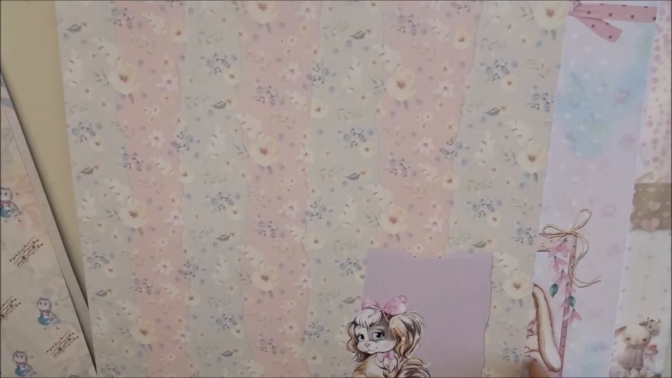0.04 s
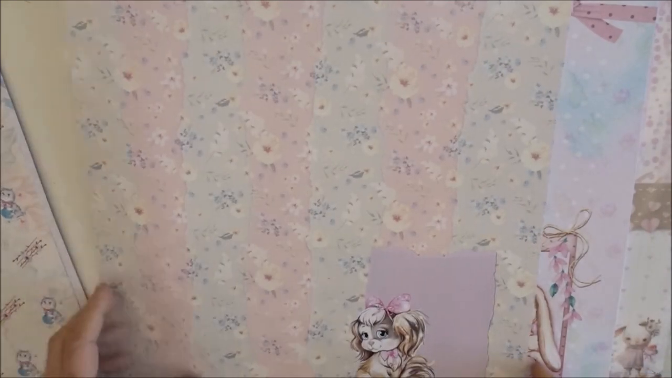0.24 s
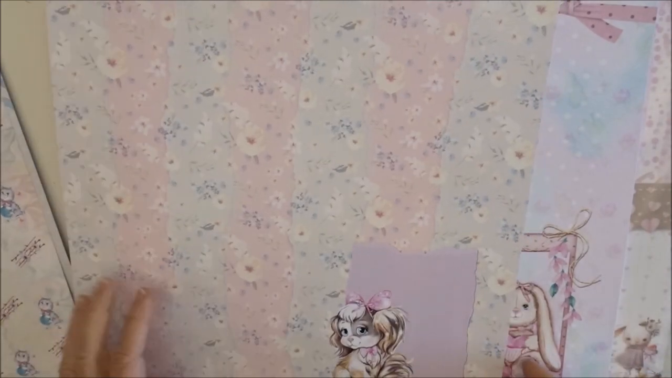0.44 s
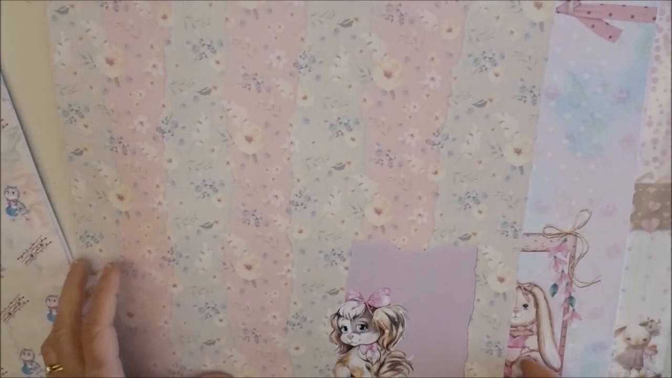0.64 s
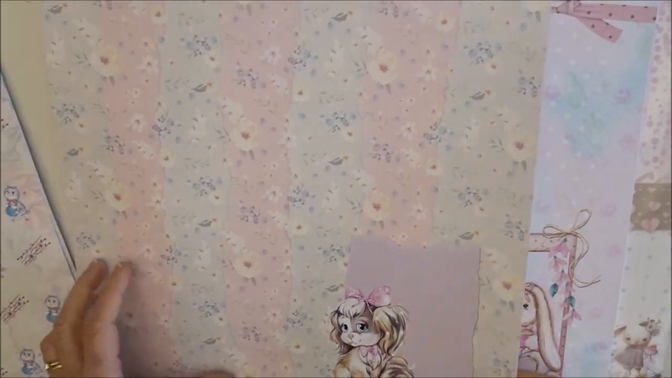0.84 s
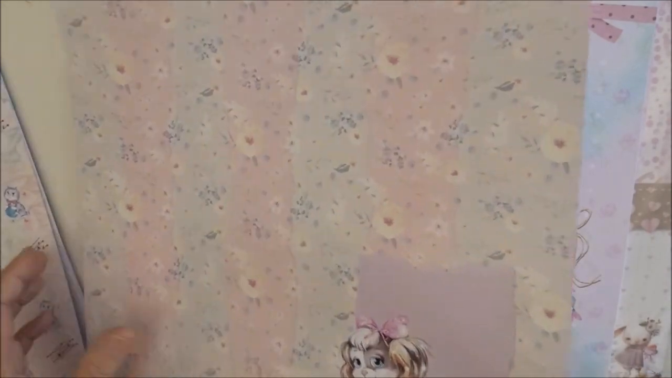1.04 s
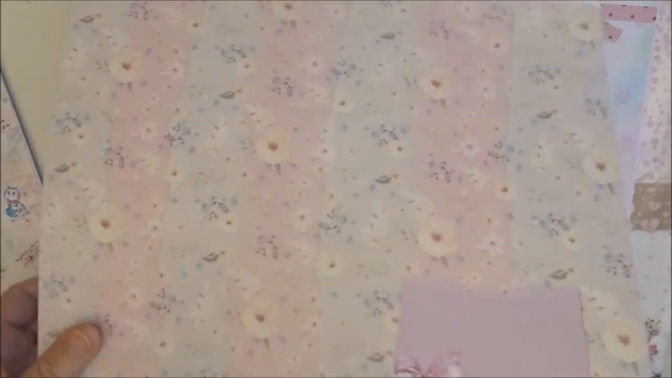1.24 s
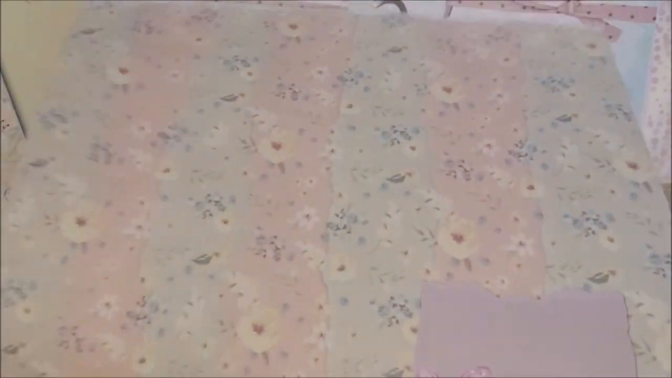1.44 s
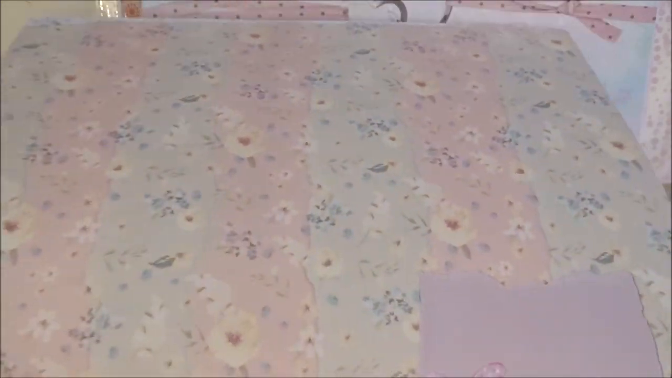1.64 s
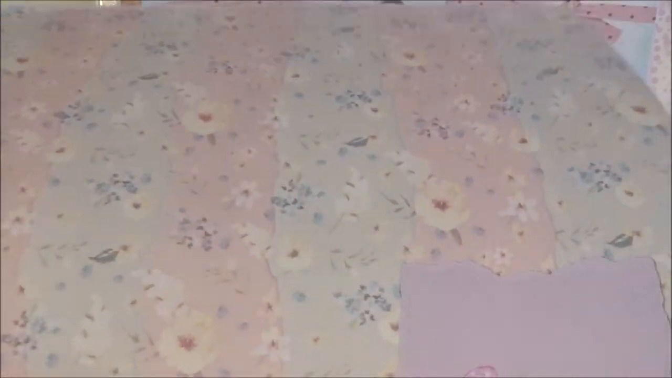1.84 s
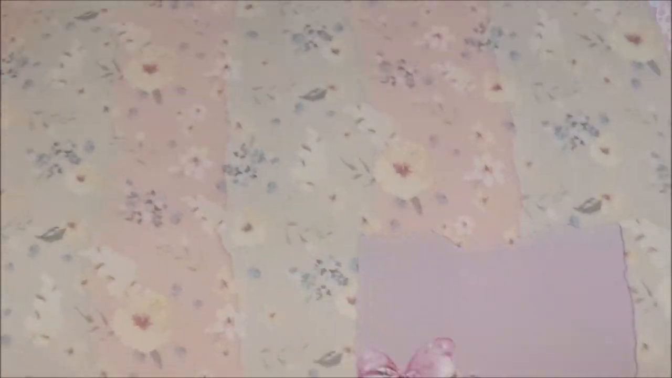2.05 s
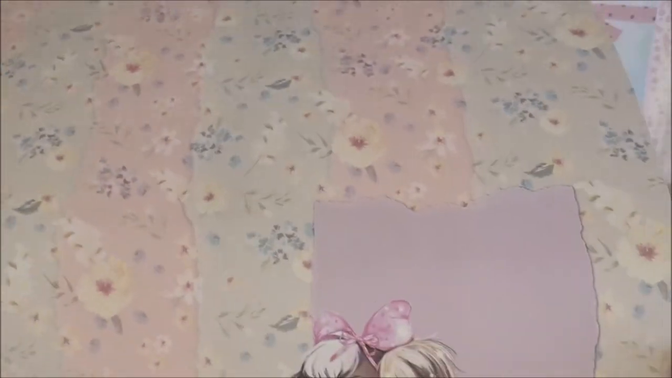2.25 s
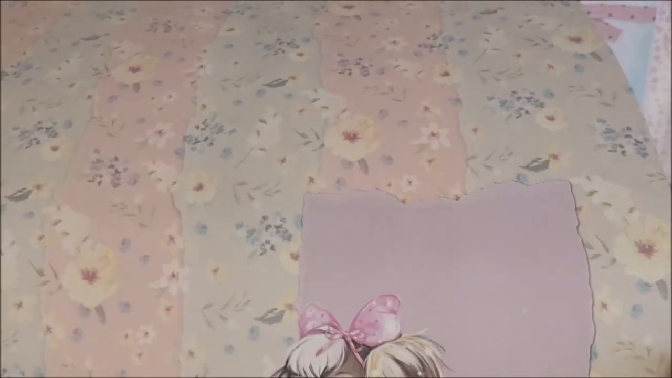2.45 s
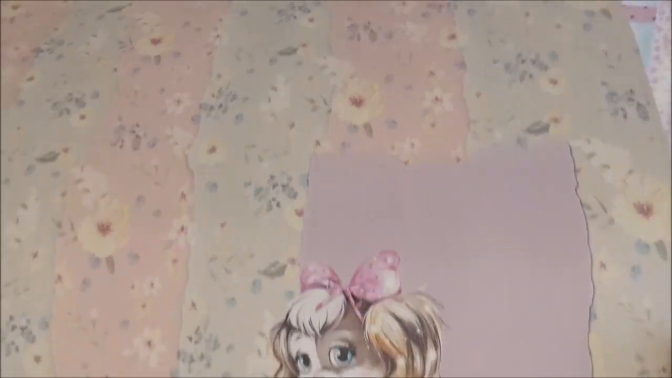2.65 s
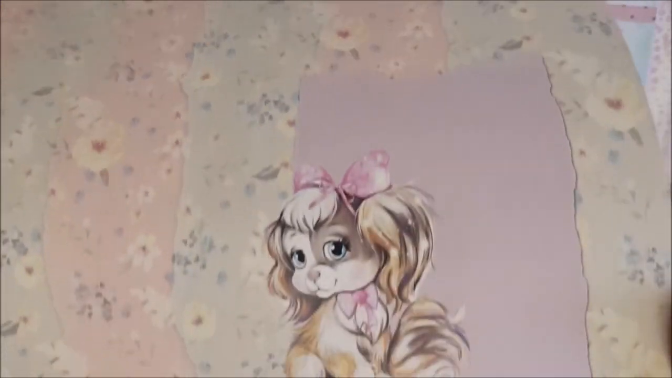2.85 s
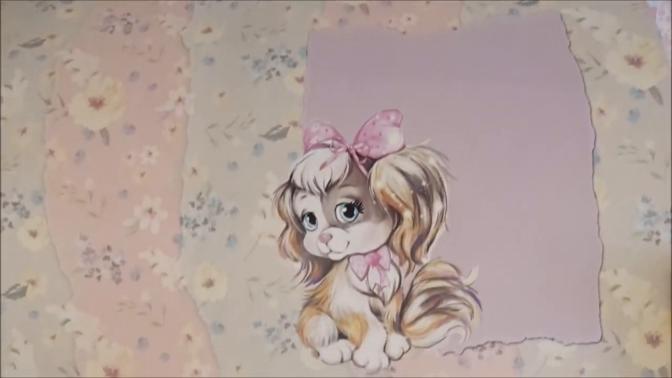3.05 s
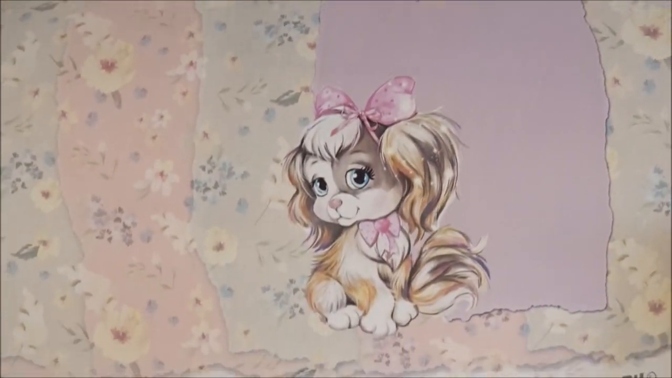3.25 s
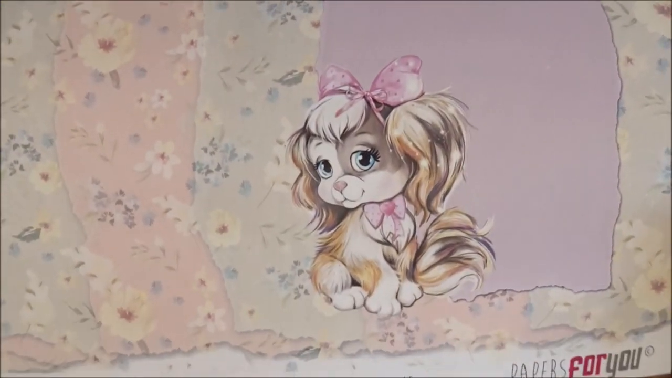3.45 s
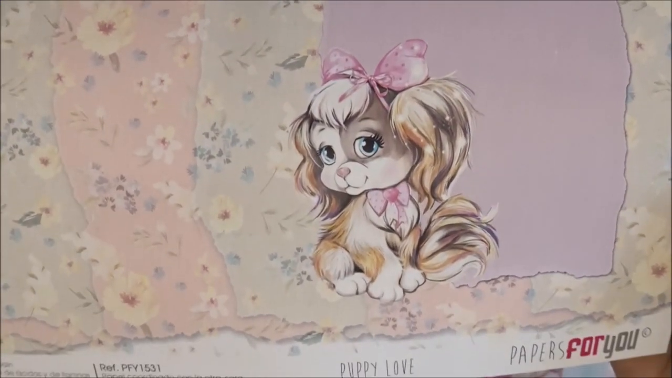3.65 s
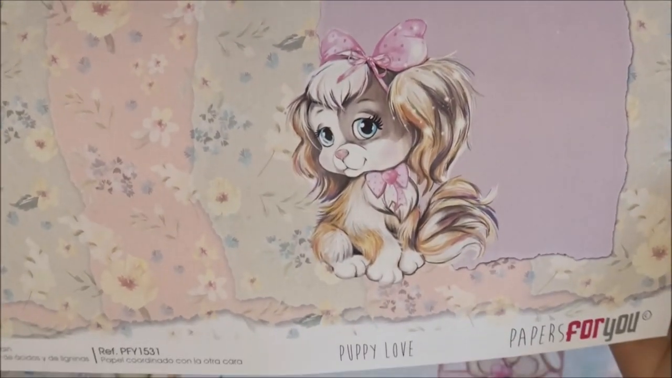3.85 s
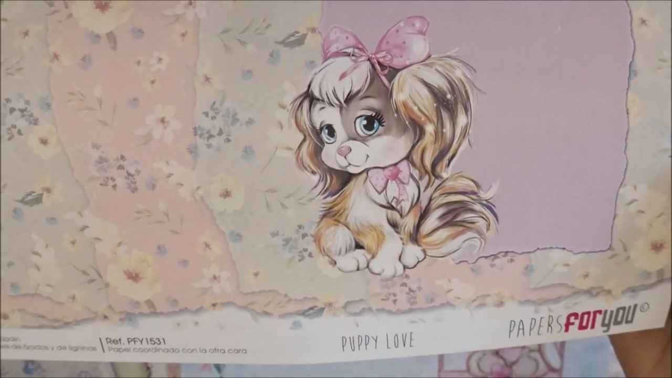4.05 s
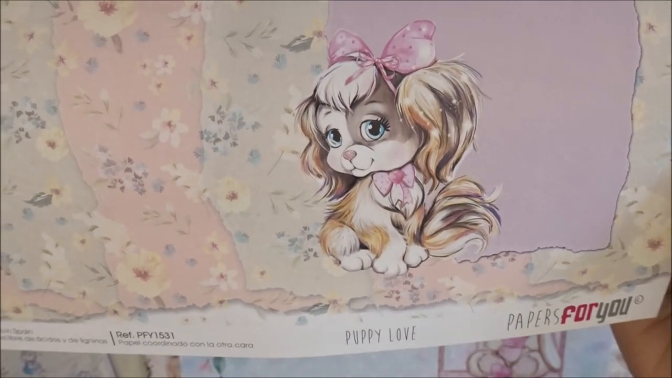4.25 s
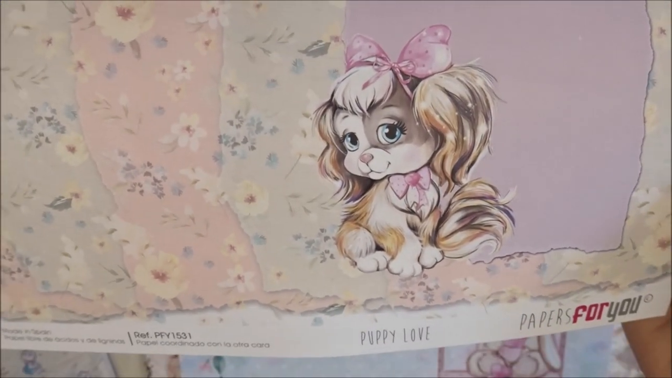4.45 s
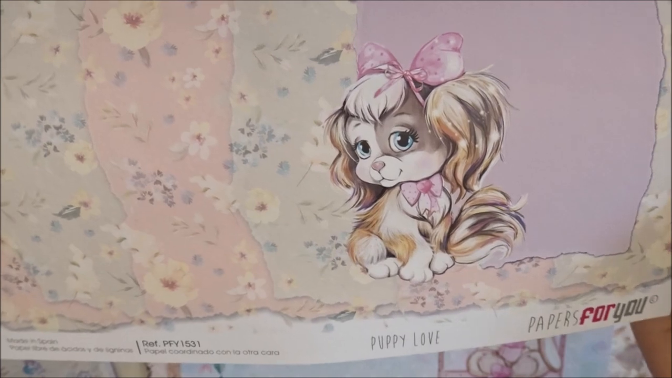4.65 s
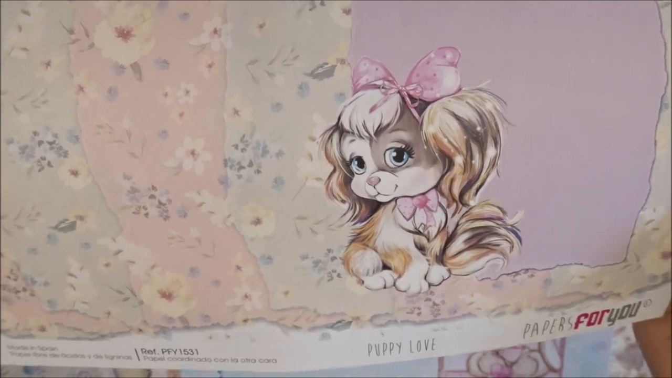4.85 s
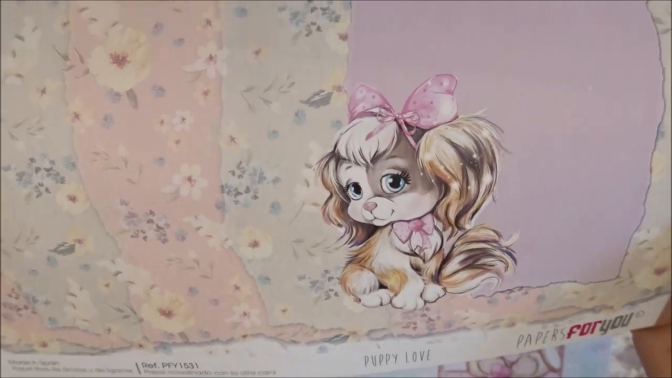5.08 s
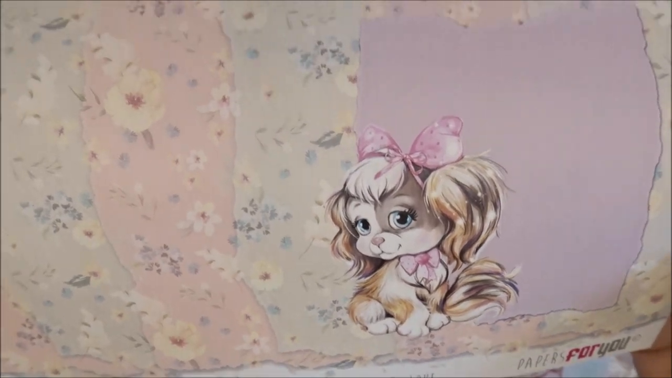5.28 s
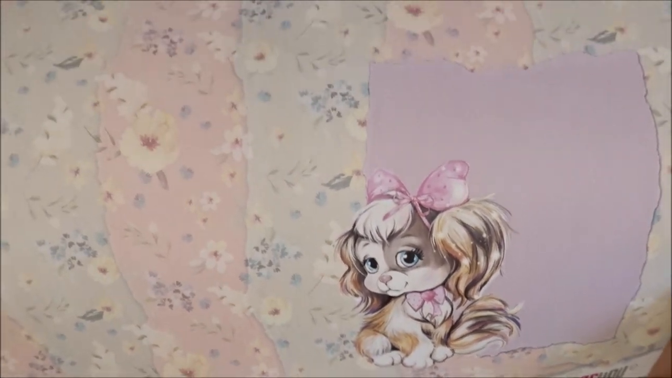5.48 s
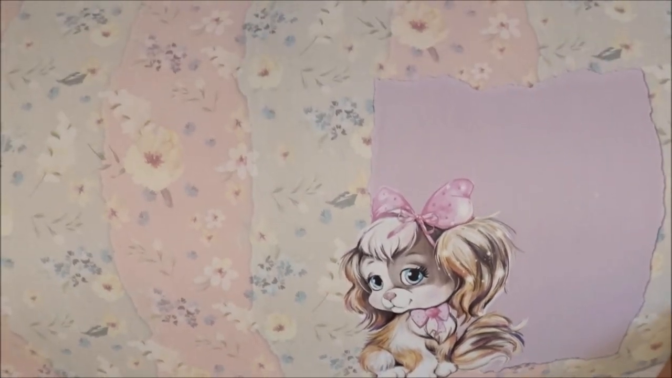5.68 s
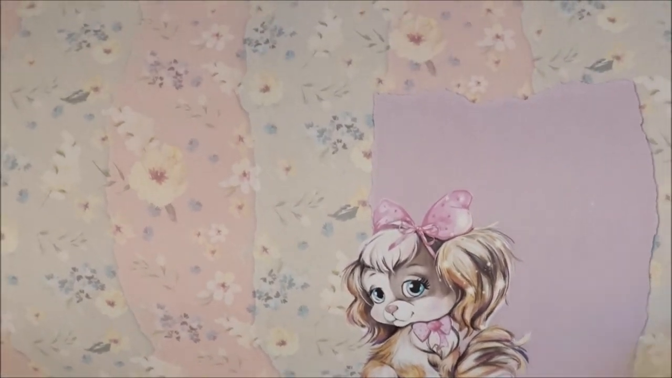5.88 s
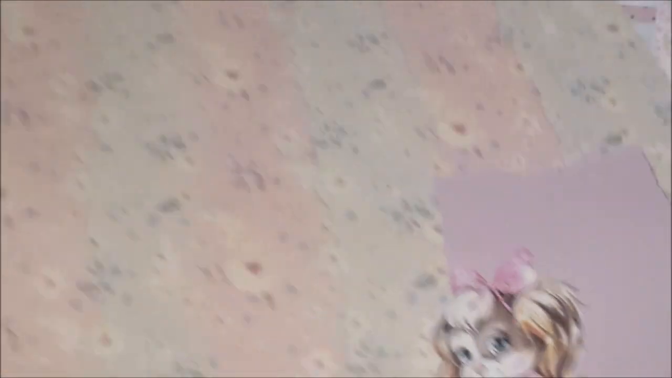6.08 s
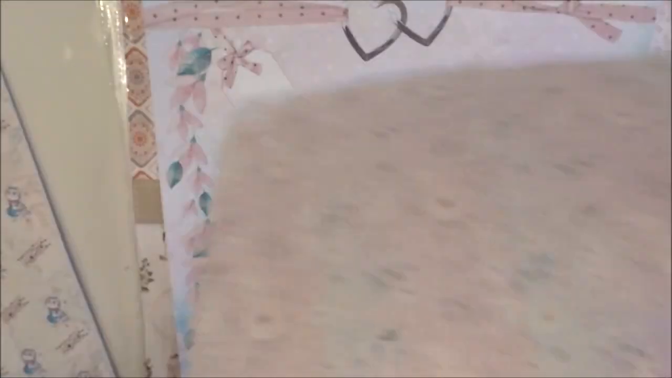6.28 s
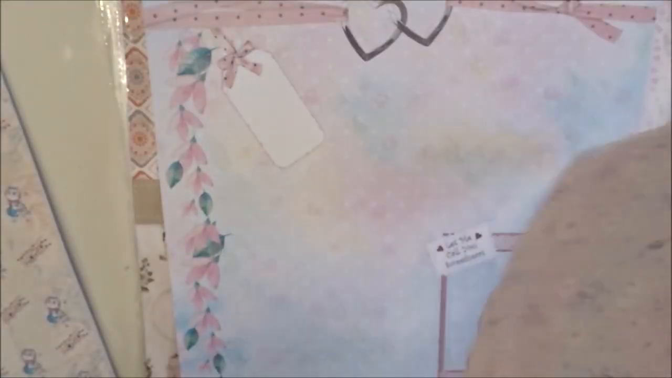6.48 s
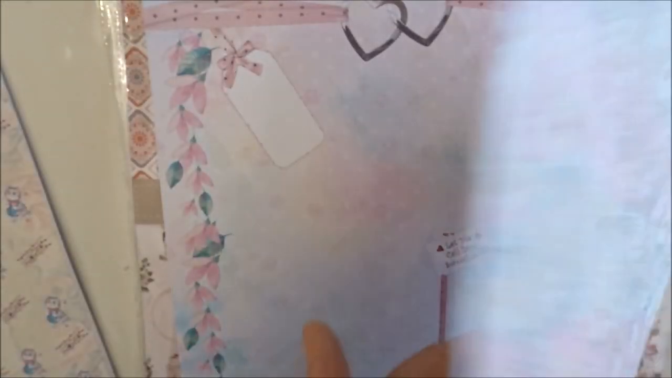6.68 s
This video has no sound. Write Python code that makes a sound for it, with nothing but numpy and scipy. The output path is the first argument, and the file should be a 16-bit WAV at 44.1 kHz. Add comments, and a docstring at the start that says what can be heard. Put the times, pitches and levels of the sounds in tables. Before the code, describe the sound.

Dry rubs and sharp clicks of a handled paper sheet, loud flexing pops early, midway and near the end, with near-quiet between.

```python
"""Dry rustles, low rumbles, pops and ticks are heard as stiff card paper is handled in a quiet room.
Skin and edges rub the sheet: clumped friction noise drives broad resonances, a hiss and a moving tone.
Bending excites low modes, a bulge flipping over sends out a short pulse, a catch is a dying noise burst.
Pops and ticks reverberate as decaying noise; a low wavering sine hums over a hush of filtered noise."""
import sys
import numpy as np
from scipy import signal
from scipy.fft import rfft, irfft, next_fast_len
from scipy.io import wavfile
from scipy.ndimage import uniform_filter1d, map_coordinates

SR = 44100
rng = np.random.default_rng(int(sys.argv[2]) if len(sys.argv) > 2 else 0)


def to_wav(s):
    """Save 16-bit WAV."""
    ch = np.atleast_2d(s).T  # columns
    pcm = np.round(np.clip(ch, -1, 1) * 32767)  # PCM
    wavfile.write(sys.argv[1], SR, pcm.astype(np.int16))


N = 296352  # samples


def amp(db):
    """Decibels are logarithmic: dB to a linear gain."""
    return 10 ** (np.asarray(db) / 20)


def unit(x):
    """Normalisation of mean power: the signal scaled to rms 1."""
    return x / np.sqrt(np.mean(x ** 2) + 1e-20)


def along(points, hz):
    """Logarithmic frequency scale: (Hz, value) points joined by lines on a log axis."""
    f, v = np.transpose(points)
    return np.interp(np.log(hz + 1), np.log(f + 1), v)


def curves(rows):
    """Linear interpolation in time: one value per sample for each column after the seconds."""
    s, *cols = np.transpose(rows)
    return [np.interp(np.arange(N) / SR, s, c) for c in cols]


def wobble(rate):
    """Slow random modulation: a smooth curve through normal random knots, rate knots a second."""
    knots = rng.standard_normal(int(N * rate / SR) + 4)
    return map_coordinates(knots, [np.arange(N) * rate / SR])


def filtered(x, response):
    """Linear filtering: the spectrum of x times a complex response of frequency."""
    m = next_fast_len(N + SR // 2)
    return irfft(rfft(x, m) * response(np.fft.rfftfreq(m, 1 / SR)), m)[..., :N]


def tones(modes):
    """Modal superposition: causal resonances of (Hz, width Hz, dB), summed with alternating sign."""
    def response(f):
        total = 0
        for k, (centre, width, db) in enumerate(modes):
            damping = 1j * f * width
            total = total + (-1) ** k * amp(db) * damping / (centre * centre - f * f + damping)
        return total
    return response


def twice(modes):
    """Cascaded resonance: the modes passed twice leave dark valleys between them."""
    return lambda f: tones(modes)(f) ** 2


# Likeness of left and right. Each row: frequency in Hz, correlation from -1 to 1.
LIKENESS = [(380, 1), (950, 0.92), (2380, 0.71), (5980, 0.43), (15000, -0.73)]


def stereo(pair, response, likeness):
    """Interaural coherence: two unrelated signals, coloured and mixed as sum and difference."""
    def mid_side(hz):
        turn = np.arccos(np.clip(along(likeness, hz), -1, 1)) / 2
        return response(hz) * np.array([np.cos(turn), np.sin(turn)])
    mid, side = filtered(pair, mid_side)
    return np.array([mid + side, mid - side])


def spread(pair, response, likeness=LIKENESS):
    """Interaural coherence at unit power: the stereo mix scaled to rms 1."""
    return unit(stereo(pair, response, likeness))


def slips(grain_db, rate):
    """Stick-slip friction: countless tiny slips as noise whose strength comes in clumps."""
    return amp(grain_db * wobble(rate)) * rng.standard_normal((2, N))


def jerks(rate, size_db, fade_s):
    """Stick-slip release: the grip gives at random instants; sudden rises in dB sink back."""
    kicks = (rng.random(N) < rate / SR) * rng.exponential(size_db, N)
    rise = signal.lfilter([1], [1, -np.exp(-1 / (fade_s * SR))], kicks)
    return np.minimum(rise - rise.mean(), 6)


def gestures(rows):
    """Addition of powers: swell, run and release summed in dB; further columns weighted by power."""
    swell_db, let_go_db_per_s, rest_db = 15.5, 820, -64.5  # rest: the floor with hands still
    t = np.arange(0, N / SR + .002, .002)
    power = []
    for s, swell, run, db, sag, *_ in rows:
        corners_s = np.cumsum([s - swell / 2, swell / 2, swell, run, 80 / let_go_db_per_s])
        corners_db = db - np.array([60, swell_db, 0, sag, sag + 80])
        power.append(amp(2 * np.interp(t, corners_s, corners_db)))
    power = np.array(power)
    total = power.sum(0)
    further = [(np.array(column) @ power) / total for column in list(zip(*rows))[5:]]
    return curves(np.transpose([t, 10 * np.log10(total + amp(2 * rest_db)), *further]))


# Spectrum of the hush. Each row: frequency in Hz, relative density in dB per Hz.
HUSH_SPECTRUM = [(15, -53), (25, -2.5), (145, -19), (180, -4.5), (384, -4.5), (1020, -9.5), (1230, -3.5),
                 (3250, -13), (4140, -14.5), (7710, -16.5), (16000, -27.5)]
# Likeness of left and right in the hush. Each row: frequency in Hz, correlation from -1 to 1.
HUSH_LIKENESS = [(60, 0.24), (950, -0.7), (15000, -0.04)]


def hush():
    """Stationary ambient noise: filtered random noise at a constant level."""
    noise = rng.standard_normal((2, N))
    return amp(-54) * spread(noise, lambda hz: amp(along(HUSH_SPECTRUM, hz)), HUSH_LIKENESS)


# Swelling of the hum. Each row: time in seconds, level in dB.
HUM_LEVEL = [(0, -59.5), (2.42, -54), (3.0, -48), (3.15, -62.5), (4.6, -56), (4.75, -52), (5.3, -50),
             (5.42, -59), (5.8, -71), (5.95, -49.5), (6.72, -55)]


def hum():
    """Frequency and amplitude modulation: a low sine wavers in pitch and strength amid narrow noise."""
    level_db, = curves(HUM_LEVEL)
    pitch_hz = 52.5 + 1.79 * wobble(5.4)
    tone = np.sin(2 * np.pi * np.cumsum(pitch_hz) / SR)
    blur = unit(filtered(rng.standard_normal(N), tones([(45, 52, 0)])))
    return amp(level_db) * unit(amp(1.1 * wobble(14)) * tone + 0.5 * blur)


# Decay of the room. Each row: frequency in Hz, time to fall by 60 dB in seconds.
ROOM_DECAY = [(150, 0.54), (450, 0.25), (1200, 0.23), (4000, 0.025), (12000, 0.24)]


def room(x):
    """Reverberant decay: each frequency dies at its own speed, in a new random tail every quarter second."""
    out, step, delay = np.zeros((2, N + 2 * SR)), SR // 4, 180  # in samples
    for start in range(0, N, step):
        hz, t, z = signal.stft(rng.standard_normal((2, SR // 2)), SR, nperseg=256)
        decay = amp(-60 * t / along(ROOM_DECAY, hz)[:, None])
        tail = signal.istft(z * decay, SR, nperseg=256)[1]
        tail /= np.linalg.norm(tail, axis=1, keepdims=True)
        wet = signal.fftconvolve(x[None, start:start + step], tail, axes=1)
        out[:, start + delay:start + delay + wet.shape[1]] += wet
    return stereo(out[:, :N], np.ones_like, LIKENESS)


# Spectrum of the pushed air. Each row: frequency in Hz, relative density in dB per Hz.
AIR_SPECTRUM = [(40, -32), (70, 9), (130, 12.5), (230, 8.5), (320, -37)]
# Air pushed by the sheet. Each row: time in seconds, level in dB.
FAN_LEVEL = [(1.08, -60.5), (1.16, -40.5), (1.55, -43), (1.7, -60), (2.15, -47.5), (2.4, -84),
             (2.76, -48.5), (2.98, -45), (3.1, -58), (5.85, -69), (5.93, -44.5), (6.42, -40), (6.72, -51)]


def fanned_air():
    """Turbulent flow: the moving sheet fans the air, heard as low noise in slow gusts."""
    air = spread(slips(3.5, rate=18), lambda hz: amp(along(AIR_SPECTRUM, hz)))
    return amp(curves(FAN_LEVEL)[0]) * air


# Catches, from dry ticks to short rasps. Each row: start in seconds, peak in dB, pitch in Hz,
# time for the noise to fall by 60 dB in seconds.
CATCHES = [(0.1733, -27, 2970, 0.0049), (0.264, -16, 2540, 0.012), (0.4163, -22.5, 3400, 0.0087),
           (0.45, -13.5, 4360, 0.004), (0.5307, -26, 2500, 0.0072), (0.545, -33, 2500, 0.01),
           (0.571, -27.5, 2990, 0.016), (0.6907, -24.5, 5140, 0.067), (0.733, -24, 4740, 0.022),
           (0.814, -18, 2900, 0.0036), (0.8266, -20.5, 2180, 0.0069), (1.105, -22.5, 5800, 0.022),
           (1.266, -6.5, 3020, 0.0046), (1.3647, -21.5, 3760, 0.0087), (1.501, -13.5, 3950, 0.016),
           (1.634, -19, 4170, 0.04), (1.647, -16, 4100, 0.087), (1.811, -19.5, 1990, 0.012),
           (2.031, -23.5, 3530, 0.019), (2.593, -22, 1250, 0.033), (2.899, -23, 3800, 0.02),
           (3.132, -33, 3320, 0.024), (3.414, -34, 2500, 0.03), (3.598, -33, 2500, 0.024),
           (4.617, -36, 4200, 0.023), (5.099, -39, 4200, 0.036), (5.992, -24.5, 3840, 0.024),
           (6.0974, -30, 3470, .02), (6.178, -25, 4500, 0.012)]


def ticks():
    """Impulsive excitation of a resonator: a catch lets go in a dying noise burst that rings broadly."""
    out, t = np.zeros(N + SR), np.arange(SR // 10) / SR
    hz = np.fft.rfftfreq(len(t), 1 / SR)
    for s, db, pitch_hz, t60 in CATCHES:
        noise = rng.standard_normal(len(t)) + 5 * (t == 0)  # the first instant is a sharp click
        width_hz = 0.29 * pitch_hz + 15 / t60  # drier catches ring more broadly
        ring = twice([(pitch_hz, width_hz, 0)])
        burst = irfft(rfft(noise * amp(-60 * t / t60)) * ring(hz), len(t))
        out[round(s * SR):][:len(t)] += amp(db) * burst / np.abs(burst).max()
    return out[:N]


# Bulges flipping over. Each row: time in seconds, level in dB, nominal pitch in Hz.
FLIPS = [(0.4625, -27, 390), (1.151, -11.5, 590), (1.262, 2.5, 627), (1.2887, -3, 620), (1.3735, -8, 710),
         (1.3835, -5, 645), (1.5021, -12.5, 740), (1.812, -27, 435), (2.051, -21.5, 394),
         (2.3928, -29.5, 554), (2.596, -21.5, 633),(3.2738, 0, 552), (3.4171, -25.5, 554),
         (3.7181, -14.5, 455), (4.522, -12.5, 466), (5.994, -15, 900), (6.181, -17.5, 600),
         (6.303, -6, 690), (6.3118, -8, 785), (6.3983, -19, 750), (6.413, -17, 800)]


def pops():
    """Snap-through buckling: a bulge flips and sends a three-lobed pulse; the slack sheet rings on."""
    push, t = np.zeros(N + SR), np.arange(-200, 200) / SR
    window = np.hanning(len(t))
    for s, db, hz in FLIPS:
        cycles = t * hz * np.where(t < 0, 1.2, .9)  # it snaps fast and settles slower
        pulse = np.cos(2 * np.pi * cycles) * np.exp(-(cycles / .6) ** 2)
        balanced = pulse - pulse.sum() * window / window.sum()  # no net pressure remains
        push[round(s * SR) - 200:][:len(t)] -= amp(db) * balanced
    push = push[:N]
    ring = filtered(np.roll(push, 130), tones([(408.0, 11.5, 0.0132)]))  # delayed by 130 samples
    return push + amp(3.5) * ring


# Bending modes of the slack sheet. Each row: frequency in Hz, width in Hz, level in dB.
SLACK_MODES = [(246, 122, -9.5), (308.4, 56.5, -2), (415, 38.3, -1.5)]
# Bending modes of the taut sheet. Each row: frequency in Hz, width in Hz, level in dB.
TAUT_MODES = [(509, 59, 3.5), (669, 99, 3), (788, 83, 7), (910, 265, 2.5), (1304, 790, -7)]
# Bouts of buckling. Each row: start in seconds, swell in seconds, run in seconds, level in dB,
# sag over the run in dB.
BUCKLING = [(.25, 0.012, 0.12, -33, 30), (.455, 0.004, 0.043, -37, 28), (1.147, 0.013, 0.074, -18, 5.5),
            (1.24, 0.034, 0.072, -18, 12), (1.345, 0.025, 0.16, -16.5, 12), (1.805, 0.0053, 0.12, -39, 2),
            (2.027, 0.014, 0.078, -28.5, 22), (2.15, 0.016, 0.03, -34, 16), (2.885, 0.019, 0.15, -35.5, 7),
            (4.53, .02, 0.15, -48.5, -1), (6.085, 0.019, 0.054, -30.5, 23),
            (6.292, 0.011, 0.055, -11.5, 8.5), (6.375, 0.03, 0.087, -13, 30),
            (6.51, 0.062, 0.058, -26.5, 25)]


def bending():
    """Flexural vibration: small buckling steps and the rumble under each stroke excite bending modes."""
    stroke_db, *_, rumble_db = gestures(STROKE_ROWS)
    buckle_db, = gestures(BUCKLING)
    bend_db = 10 * np.log10(amp(2 * buckle_db) + amp(2 * (stroke_db + rumble_db)))
    slack = spread(slips(2.1, rate=110), tones(SLACK_MODES))
    taut = spread(slips(2.9, rate=160), tones(TAUT_MODES))
    stiff_db = 0.11 * (bend_db + 40.0)  # a harder bend stiffens the sheet: the slack modes recede
    steps = amp(-4.0 - stiff_db) * slack + amp(-3.0) * taut
    return amp(bend_db + jerks(35, size_db=1.6, fade_s=0.018)) * steps


def drifting(x, patchy_db):
    """Spectral fluctuation: the wandering contact shifts the colour by random patches in time and pitch."""
    z = signal.stft(x, nperseg=512)[2]
    field = uniform_filter1d(rng.standard_normal(z.shape[1:]), size=5, axis=0)  # over pitch
    field = uniform_filter1d(field, size=22, axis=1)  # over time
    return unit(signal.istft(z * amp(patchy_db * unit(field)), nperseg=512)[1][:, :N])


def creases(rate, size_db):
    """Crackling as a random point process: small creases give way in clicks of very different sizes."""
    return (rng.random((2, N)) < rate / SR) * amp(rng.exponential(size_db, (2, N)).clip(0, 14))


# Song of the free part of the sheet, moving with the finger. Each row: time in seconds, pitch in Hz,
# level over the rub in dB.
SONG = [(0.42, 1800, -9), (0.69, 1750, -1), (0.75, 2300, -5), (0.82, 2400, -2), (0.87, 3100, -1),
        (1.09, 3300, -7.5), (1.125, 900, 1.5), (1.6, 3400, -11), (1.66, 4300, -5), (1.7, 3500, -8),
        (1.77, 3500, -9), (1.8, 2000, -11), (1.96, 2100, -15), (2.0, 3594, 2), (2.5, 3497, -4),
        (4.25, 4093, -7.5), (5.4, 4074, -0.5), (5.9, 3600, -29), (6.22, 3200, -7), (6.46, 4100, -7.5)]


def singing(width_hz):
    """Quadrature modulation: slow friction noise carries a narrow band along a moving pitch."""
    pitch_hz, level_db = curves(SONG)
    noise = np.vstack([slips(3.3, rate=110), slips(1.4, rate=120)])
    a, b, c, d = filtered(noise, lambda hz: 1 / (1 + (hz / width_hz) ** 2))
    phase = 2 * np.pi * np.cumsum(pitch_hz) / SR
    pair = np.array([a * np.cos(phase) + b * np.sin(phase), c * np.cos(phase) + d * np.sin(phase)])
    return amp(level_db) * spread(pair, np.ones_like)


# Tones heard with the rub, from deep to top. Each row: frequency in Hz, width in Hz, level in dB.
DEEP_MODES = [(1270, 330, 0)]
MIDDLE_MODES = [(1518, 390, 0.64), (2322, 806, 1.8)]
MAIN_MODES = [(3050, 1280, 1), (4650, 1700, -0.87)]
CLEAR_MODES = [(3600, 280, 0)]
TOP_MODES = [(5050, 450, 0), (6950, 450, -3)]
# Strength of the deep tone. Each row: time in seconds, level in dB.
DEEP_LEVEL = [(0, -10), (1.66, -6), (2.45, -0.5), (2.8, -3), (3.3, 3), (4.95, -1.5), (5.2, -24), (6.0, -4),
              (6.25, -10), (6.41, 1.5), (6.72, -18)]
# Spectrum of the fibres' thin hiss. Each row: frequency in Hz, relative density in dB per Hz.
HISS_SPECTRUM = [(3290, -11), (5600, -1), (7010, -3.5), (9500, -5.5), (15000, -12.5), (16000, -43)]
# Place of the rub. Each row: time in seconds, left over right in dB.
PAN = [(0, -1.5), (0.9, 0), (2.4, 1.5), (4.7, -2), (6.3, 1), (6.72, 5.5)]
# Strokes of skin or edge. Each row: start in seconds, swell in seconds, run in seconds, level in dB,
# sag over the run in dB, grip from 1 loose to 2 tight, thin hiss in dB, rumble in dB.
STROKE_ROWS = [(.185, 0.043, 0.022, -35, 18, 1.15, -0.5, -9.5),
               (.245, 0.045, 0.09, -23, 22.5, 1.65, 2, -25.5), (.37, 0.011, 0.29, -48, 1, 1.4, -4.5, -3),
               (.63, 0.025, 0.15, -38.5, -1, 1.64, -5, -11),
               (.77, 0.084, 0.094, -36.5, 3.5, 1.84, 0, -14.5),
               (.95, 0.0088, 0.17, -41, -3, 1.86, -4, -11.5),
               (1.22, 0.051, 0.11, -31.5, 10.5, 1.8, -10, 13),
               (1.4, 0.06, 0.074, -28.5, 27, 2.26, -5.5, -1),
               (1.495, 0.0026, 0.2, -29.5, 13.5, 1.67, -9, 1),
               (1.632, 0.0021, 0.15, -31, -0.5, 2.18, -6, -6.5),
               (1.77, 0.024, 0.2, -33.5, 9.5, 1.25, -1.5, -7), (1.99, 0.031, 0.11, -42, 8, 2.26, -6.5, -6),
               (2.07, 0.13, 0.21, -41, 13.5, 1.88, -8.5, -2.5),
               (2.434, 0.014, 0.23, -39, -1.5, 1.62, -14.5, -6.5),
               (2.64, 0.087, 0.18, -36.5, 4.5, 1.54, -2, -1.5), (2.9, .02, 0.24, -48, 4.5, 1.1, -4.5, 8),
               (3.16, 0.069, 0.05, -41, 3.5, 1.7, -10.5, 3.5), (3.28, 0.17, 0.3, -50.5, 8, 1.15, -14, 6),
               (4.17, 0.15, 0.25, -52, 4.5, 1.66, -19, 6), (4.62, 0.19, 0.6, -52, 17.5, 1.5, -10, 2.5),
               (5.87, 0.12, 0.1, -40, -1.5, 2.1, -9.5, 2.5), (6.085, 0.005, 0.11, -36.5, 2, 2.2, -1, -6),
               (6.175, 0.0097, 0.093, -28.5, 1, 2.15, -3, -3),
               (6.319, 0.0034, 0.11, -26, 17.5, 1.66, -2.5, -0.5),
               (6.37, 0.048, 0.1, -29.5, 1.5, 2.17, -1.5, -5.5),
               (6.52, .01, 0.23, -45.5, 14, 0.94, -3, 5.5), (6.57, 0.14, .05, -45.5, 0, 1.1, -4, -2)]


def sliding():
    """Friction-driven resonance: skin and edges rub the fibres; tones and a hiss answer."""
    level_db, grip, hiss_db, _ = gestures(STROKE_ROWS)
    pan_db, = curves(PAN)
    rub = amp(-1.5) * spread(slips(1.9, rate=470), twice(MAIN_MODES))
    # level with no grip in dB, change for each step of grip in dB
    for modes, db, step_db in ((MIDDLE_MODES, 7, -6), (CLEAR_MODES, -38.5, 14.5), (TOP_MODES, -13.5, 3.5)):
        waver_db = 1.6 * wobble(12)
        rub += amp(db + step_db * grip + waver_db) * spread(slips(1.4, rate=260), twice(modes))
    deep_db = curves(DEEP_LEVEL)[0] + 0.72 * wobble(9.9)
    rub += amp(deep_db) * spread(slips(1.1, rate=490), twice(DEEP_MODES))
    rub += amp(hiss_db) * spread(slips(1.0, rate=460), lambda hz: amp(along(HISS_SPECTRUM, hz)))
    rub = np.sqrt(np.mean(rub ** 2)) * drifting(rub, patchy_db=1.6)
    rub += singing(width_hz=170)
    rub += amp(-17) * spread(creases(150, size_db=2), twice([(3500, 4800, 0)]))
    rub *= amp(level_db + jerks(29, size_db=2.5, fade_s=0.0052) + np.outer([.5, -.5], pan_db))
    lead = 0.38 * pan_db  # in samples: the nearer side hears it first
    left = map_coordinates(rub[0], [np.arange(N) + lead], mode="nearest")
    right = map_coordinates(rub[1], [np.arange(N) - lead], mode="nearest")
    return np.array([left, right])


def scene():
    """Superposition: hush, hum, moved air and the handled sheet add up, pops and ticks with echoes."""
    pop, tick = pops(), ticks()
    echoes = room(amp(-8.5) * pop + amp(-2.5) * tick)
    return hush() + hum() + echoes + fanned_air() + tick + pop + bending() + sliding()


def record(dry):
    """Saturation and band limiting: peaks round off at full scale, nothing stays above the limit."""
    rounded = dry / (1 + np.abs(dry) ** 16) ** (1 / 16)
    return filtered(rounded, lambda hz: hz < 15900)


dry = scene()
out = record(dry)
to_wav(out)
```